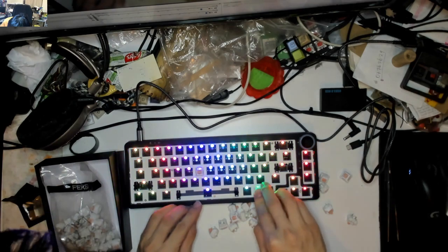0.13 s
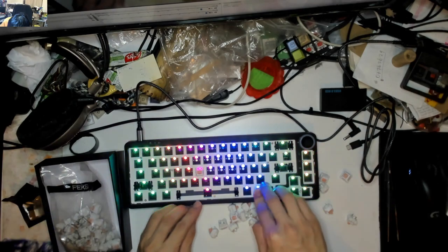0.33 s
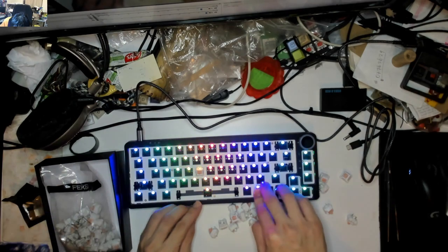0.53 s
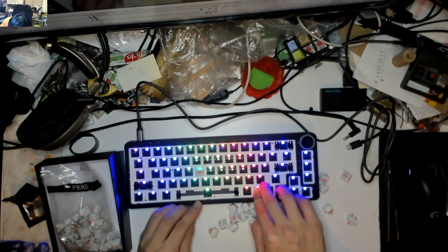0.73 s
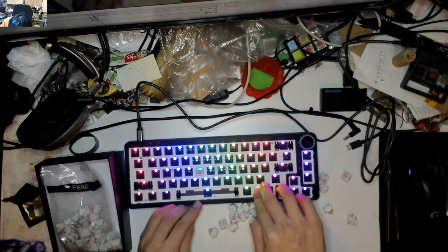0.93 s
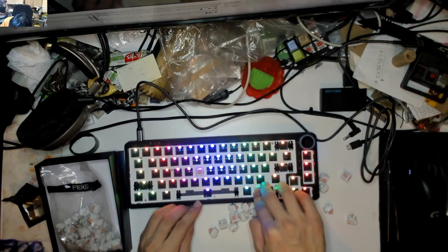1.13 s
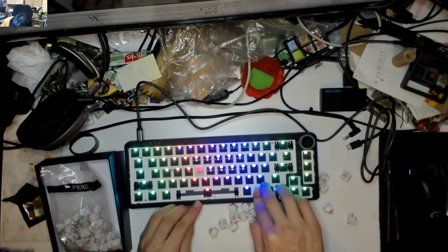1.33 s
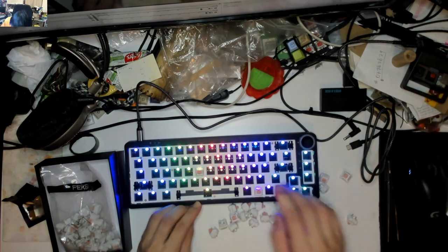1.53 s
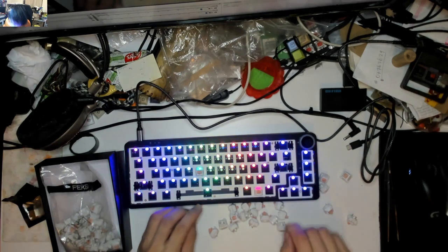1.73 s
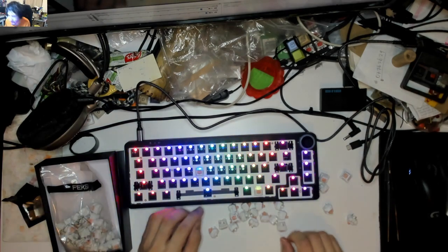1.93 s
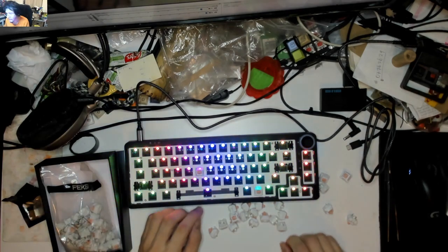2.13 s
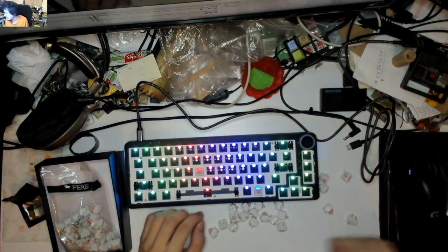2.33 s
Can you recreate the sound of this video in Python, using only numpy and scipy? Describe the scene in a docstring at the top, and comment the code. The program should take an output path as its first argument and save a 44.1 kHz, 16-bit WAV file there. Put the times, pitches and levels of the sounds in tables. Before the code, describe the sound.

A mechanical keyboard clack on a desk. Faint finger rubbing and tiny plastic ticks fill the first 0.6 seconds, then near quiet. At 1.13 a key is pushed down with a dull knock; at 1.42 it snaps with a loud, sharp clack and low desk boom. A light rattling click comes at 1.8, soft hand knocks at 2.0 and 2.2. Small room, low rumble, slight hiss, faint hum.

```python
"""A mechanical keyboard on a desk: fingers tick on the keys, one key is pushed down with a dull knock
and then snaps with a loud clack; a light, rattling click and soft knocks follow as the hand leaves.
Keys and desk top ring as sets of decaying sines, the keys with a short noise rattle; hard touches add a tick.
Three pushes make the desk boom and shudder, and a small, cluttered room reflects the keys and knocks.
Fingers brush the keys as uneven noise, over steady rumble, hiss and a faint, wavering hum."""
import sys
import numpy as np
from scipy import signal
from scipy.fft import rfft, irfft
from scipy.io import wavfile
from scipy.ndimage import uniform_filter1d

SR = 44100
rng = np.random.default_rng(int(sys.argv[2]) if len(sys.argv) > 2 else 0)


def generate_wav(sig):
    """Save sig (samples, or channels by samples) to the path in sys.argv[1] as 16-bit PCM at SR."""
    pcm = np.round(np.clip(np.atleast_2d(sig).T, -1, 1) * 32767).astype(np.int16)
    wavfile.write(sys.argv[1], SR, pcm)


N = 108971  # length of the scene in samples


def amp(db):
    """Turns decibels into a gain."""
    return 10 ** (np.asarray(db) / 20)


def unit(x):
    """Scales a signal to an rms of 1."""
    return x / np.sqrt(np.mean(x ** 2) + 1e-20)


def read(points, hz):
    """Reads a table between its rows, on a log-frequency axis."""
    f, value = np.transpose(points)
    return np.interp(np.log(hz + 1), np.log(f + 1), value)


def add(mix, start_s, sound):
    """Mixes a sound in at its start time and drops what runs past the end."""
    part = mix[max(round(start_s * SR), 0):][:len(sound)]
    part += sound[:len(part)]


def noise(colour, size):
    """Makes noise of rms 1 by shaping the spectrum of white noise."""
    spectrum = rfft(rng.standard_normal(size))
    gain = amp(read(colour, np.fft.rfftfreq(size, 1 / SR)))
    return unit(irfft(spectrum * gain, size))


def ring(t, rise, t60):
    """A quick rise times an exponential decay that falls by 60 dB in t60 seconds."""
    return (1 - np.exp(-t / rise)) * np.exp(-np.log(1000) * t / t60)


def cut(x, hz, kind):
    """Second-order low cut (kind "high") or high cut (kind "low")."""
    edge = np.clip(hz, 20, .48 * SR)
    return signal.sosfilt(signal.butter(2, edge, kind, fs=SR, output="sos"), x)


KEY_RISE_S = 0.00041


def modes(table, t, pitch=1):
    """Decaying sines of a struck part, neighbours swinging in opposite directions."""
    out = np.zeros(len(t))
    for k, (hz, db, t60) in enumerate(table):
        sine = np.sin(2 * np.pi * hz * pitch * t)
        out += amp(db) * ring(t, KEY_RISE_S, t60) * sine * (-1) ** k
    return out


# Colour of the bright tick. Each row: frequency in Hz, relative strength in dB per Hz.
TICK_COLOUR = [(500, -25.5), (3000, -9), (7000, -8.5), (10000, -8.5), (13000, -7), (16000, -6.5)]
TICK_T60_S, TICK_RISE_S = 0.015, .0003


def tick(t):
    """Two hard surfaces meet in a bright spit of noise that dies at once."""
    return ring(t, TICK_RISE_S, TICK_T60_S) * noise(TICK_COLOUR, len(t))


# Ringing of the switch, plate and case.
# Each row: frequency in Hz at pitch ratio 1, relative level in dB, time to fall by 60 dB in seconds.
KEY_MODES = [(375, -32.5, 0.047), (568, -29, 0.033), (850, -35, 0.04), (1020, -28.5, .05),
             (1200, -27, 0.039), (1347, -23.5, .05), (1630, -18, .03), (1893, -9, 0.025), (2390, -17, .014),
             (2695, -7, .014), (2890, -19, 0.034), (3484, -28.5, 0.039), (3997, -16, 0.018),
             (4345, -20, 0.031), (4580, -22, .036), (7750, -30, .04), (8000, -20, .014)]
# The dense rattle between those modes. Each row: frequency in Hz, relative strength in dB per Hz.
RATTLE_COLOUR = [(300, -18.5), (1000, -7), (2500, 10.5), (3500, -11.5), (4800, -8), (6300, -16), (8000, -9),
                 (11000, -22.5), (16000, -20)]
RATTLE_DB, RATTLE_T60_S = -5, 0.022  # level beside the modes, time to fall by 60 dB


def contact(level_db, low_hz, high_hz, tick_db, pitch):
    """One plastic contact: a soft one misses the high modes, a light one the low modes."""
    t = np.arange(SR // 5) / SR
    rattle = ring(t, KEY_RISE_S, RATTLE_T60_S) * noise(RATTLE_COLOUR, len(t))
    body = modes(KEY_MODES, t, pitch) + amp(RATTLE_DB) * rattle
    body = cut(cut(body, low_hz, "high"), high_hz, "low")
    return amp(level_db) * body + amp(tick_db) * tick(t)


# Plastic contacts, played here and again as bare blows further down.
# Each row: start in seconds, level in dB, low cut in Hz, high cut in Hz,
# level of the sharp tick in dB, pitch of the modes as a ratio.
CONTACTS = [(.040, -50.5, 1900, 3980, -82, 0.8), (.0805, -46, 1900, 2800, -80, 0.5),
            (.094, -47.5, 1900, 2570, -82, .95), (.2735, -54, 4380, 9000, -67, 1.14),
            (.294, -35, 7560, 11200, -63, 0.86), (.3642, -40.5, 1180, 3000, -70, .8),
            (.368, -51, 1400, 3040, -87.5, .86), (.4287, -47.5, 1260, 2560, -78, 0.76),
            (.519, -57, 1400, 2480, -64.5, .85), (.6265, -47.5, 1350, 2800, -76, 0.98),
            (1.0405, -52.5, 1490, 2920, -72, .9), (1.0768, -33.5, 1950, 4900, -38.5, 0.99),
            (1.1286, -28, 310, 1620, -44, 1.07), (1.1303, -8.5, 350, 910, -45, 0.94),
            (1.4228, -7, 2800, 8000, -42.5, 0.94), (1.4238, 1.5, 149, 13000, -15.5, 1),
            (1.4288, -16.5, 910, 2820, -47, .98), (1.786, -36.5, 5000, 6900, -71, 0.94),
            (1.7950, -31, 3830, 7800, -68, 1.3), (1.7980, -26, 2300, 3806, -62, 1.01),
            (1.806, -40, 1200, 2300, -68, 0.77), (1.819, -44, 1198, 3000, -72, 1),
            (1.836, -48, 1200, 2000, -80, 0.72), (2.075, -49.5, 1000, 1598, -75, .8)]


def keys():
    """Plastic parts strike each other: all the clicks, key knocks and the loud clack."""
    out = np.zeros(N)
    for start_s, *settings in CONTACTS:
        add(out, start_s, contact(*settings))
    return out


# Ringing of the desk top under a knock.
# Each row: frequency in Hz at pitch ratio 1, relative level in dB, time to fall by 60 dB in seconds.
KNOCK_MODES = [(590, -49.5, 0.052), (815, -48, 0.042), (980, -51, 0.096), (1366, -41.5, 0.017),
               (1680, -51, 0.023), (2060, -51.5, 0.049), (2250, -52, 0.022), (6240, -54, 0.022),
               (8190, -40, 0.016)]
# Dull knocks on the desk top. Each row: start in seconds, level in dB, high cut in Hz,
# level of the sharp tick in dB, pitch of the modes as a ratio.
KNOCKS = [(1.1306, 10, 850, -70, 0.713), (1.984, -8, 940, -80, 1.125), (2.1993, -16, 2500, -63, 1),
          (2.2140, -3.5, 5990, -46, 1), (2.2255, -7, 1000, -52, .95), (2.465, -18, 1500, -80, 0.97)]


def knocks():
    """The key bottoms out, and later the hand comes down; the desk top rings in short sines."""
    t, out = np.arange(SR // 5) / SR, np.zeros(N)
    for start_s, level_db, high_hz, tick_db, pitch in KNOCKS:
        body = cut(modes(KNOCK_MODES, t, pitch), high_hz, "low")
        add(out, start_s, amp(level_db) * body + amp(tick_db) * tick(t))
    return out


# Pushes that reach the desk. Each row: start in seconds, level in dB.
THUMPS = [(1.130, -15), (1.4246, 1), (2.204, -22)]
# Ringing of the desk and what stands on it. Each row: frequency in Hz, relative level in dB,
# time to fall by 60 dB in seconds, build-up time in seconds.
DESK_MODES = [(28.02, -27.5, 1, .04), (47, -28, .25, .02), (56, -35, 0.15, .02), (61, -46.5, 3.2, .02),
              (78, -13, 0.16, .02), (90, -21.5, .11, .015), (100.6, -44, 3.8, 0.0071),
              (95.66, -42, 1.3, 0.0085), (150, -30, .1, 0.0044), (210, -41.5, 0.73, 0.0064),
              (241, -17, 0.11, 0.019), (265, -40.5, 0.76, .006), (325.4, -41.5, 0.45, .006),
              (368.5, -25.5, .09, .012)]
# Low shudder of the desk after each push. Each row: frequency in Hz, relative strength in dB per Hz.
SHUDDER_COLOUR = [(10, -8.5), (30, -1.5), (60, -3), (85, -18.5), (160, -31.5), (500, -53.5), (2000, -89.5)]
SHUDDER_DB, SHUDDER_T60_S = -42.5, 1.8  # level before that of the push, time to fall by 60 dB


def desk(shudder_rise_s=.02):
    """Each push sets the desk booming in slow sines and shuddering in low noise."""
    t, out = np.arange(N) / SR, np.zeros(N)
    boom = np.zeros(N)
    for hz, db, t60, rise in DESK_MODES:
        boom += amp(db) * ring(t, rise, t60) * np.sin(2 * np.pi * hz * t)
    for start_s, level_db in THUMPS:
        shudder = amp(SHUDDER_DB) * ring(t, shudder_rise_s, SHUDDER_T60_S) * noise(SHUDDER_COLOUR, N)
        add(out, start_s, amp(level_db) * (boom + shudder))
    return out


# How fast the room falls silent. Each row: frequency in Hz, time to fall by 60 dB in seconds.
ROOM_T60 = [(200, .2), (700, .19), (1500, 0.16), (3000, .17), (6000, .15), (10000, 0.11), (16000, .12)]
ROOM_DELAY_S, ROOM_BUILD_S = .004, 0.0092  # silence before the reflections, then their fade-in


def room(x, colour=None):
    """Dense reflections from the cluttered desk and near walls, each band dying at its own speed."""
    size = SR // 2
    hz, t, bands = signal.stft(rng.choice([-1., 1.], size), SR, nperseg=256)
    t60 = read(ROOM_T60, hz)[:, None]
    decay = np.exp(-np.log(1000) * t / t60)
    # A slowly dying band starts lower, so that its decay holds the same energy.
    bands = bands * decay * np.sqrt(2 * np.log(1000) / (t60 * SR))
    if colour:
        bands = bands * amp(read(colour, hz))[:, None]
    tail = signal.istft(bands, SR, nperseg=256)[1][:size]
    tail = tail * np.clip((np.arange(size) / SR - ROOM_DELAY_S) / ROOM_BUILD_S, 0, 1)
    return signal.fftconvolve(x, tail)[:N]


def blows():
    """The bare force of every plastic contact: one short, filtered pulse each."""
    pulse, out = signal.unit_impulse(SR // 20), np.zeros(N)
    for start_s, level_db, low_hz, high_hz, _, _ in CONTACTS:
        blow = cut(cut(pulse, low_hz, "high"), high_hz, "low")
        add(out, start_s, amp(level_db) * blow)
    return out


# Colour of the dense wash. Each row: frequency in Hz, gain in dB.
SCATTER_COLOUR = [(100, -9), (350, 3), (650, 0), (950, 3.5), (1300, 10), (2000, 10), (2700, 7.5), (3500, 1),
                  (4400, 3), (6000, -2.5), (8000, -1.5), (11000, -7.5), (16000, -3.5)]


def scatter():
    """Blows scatter from the case and the clutter around it as a dense wash."""
    return room(blows(), SCATTER_COLOUR)


# Fingers sliding on the keys. Each row: time in seconds, level in dB before the uneven slips.
BRUSH = [(0, -74.5), (.04, -69), (.1, -68.5), (.135, -75), (.18, -69), (.22, -76), (.27, -76.5), (.45, -83),
         (.6, -82)]
# Colour of the sliding. Each row: frequency in Hz, relative strength in dB per Hz.
BRUSH_COLOUR = [(500, -29.5), (1300, -5.5), (1900, -4.5), (2450, 0.5), (2900, -13.5), (3800, -17.5),
                (4700, -9), (6000, -21.5), (16000, -29)]


def fingers(grain_db=2.5):
    """Skin rubs the plastic in small uneven slips: noise whose level flutters."""
    time_s, db = np.transpose(BRUSH)
    slips = unit(uniform_filter1d(rng.standard_normal(N), size=200))
    level_db = np.interp(np.arange(N) / SR, time_s, db) + grain_db * slips
    return noise(BRUSH_COLOUR, N) * amp(level_db)


# Colour of the rumble and hiss. Each row: frequency in Hz, relative strength in dB per Hz.
FLOOR_COLOUR = [(10, -2.5), (22, 0), (46, -0.5), (70, -22), (120, -12.5), (180, -18), (250, -18),
                (330, -26.5), (450, -28), (700, -32), (1100, -34.5), (1600, -35.5), (2300, -43.5),
                (3500, -43.5), (8000, -43), (16000, -45)]
FLOOR_DB = -56  # rms level
# The faint hum. Each row: centre frequency in Hz, rms level in dB.
HUM = [(119, -74.5), (248, -78), (452, -82), (1583, -83)]
HUM_WANDER_HZ = 5.4  # rms wander around each centre frequency


def background():
    """Steady noise makes the rumble and hiss; sines of wandering pitch make the faint hum."""
    out = amp(FLOOR_DB) * noise(FLOOR_COLOUR, N)
    for hz, db in HUM:
        wander = HUM_WANDER_HZ * unit(uniform_filter1d(rng.standard_normal(N), size=2000))
        phase = 2 * np.pi * np.cumsum(hz + wander) / SR
        out += amp(db) * np.sqrt(2) * np.sin(phase)  # sqrt(2) turns rms into peak
    return out


ROOM_DB = -20.5  # reflections of the keys and knocks


def scene():
    """Keys and knocks with their reflections, over the desk's boom, the fingers and the background."""
    direct = keys() + knocks()
    reflected = amp(ROOM_DB) * room(direct) + scatter()
    return (direct + reflected + desk() + fingers() + background())[None]


CUTOFF_HZ = 16200


def record(dry, ceiling=.8):
    """Rounds off the loudest peaks below the ceiling, then takes away the highest treble."""
    rounded = dry / (1 + (dry / ceiling) ** 6) ** (1 / 6)
    band_limit = signal.firwin(255, CUTOFF_HZ, window=("kaiser", 9), fs=SR)
    return signal.oaconvolve(rounded, band_limit[None], "same")


dry = scene()
out = record(dry)
generate_wav(out)
```